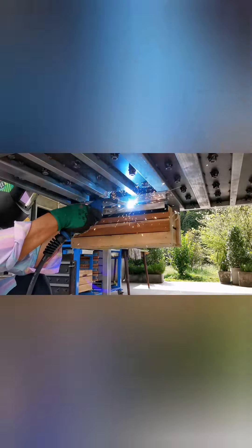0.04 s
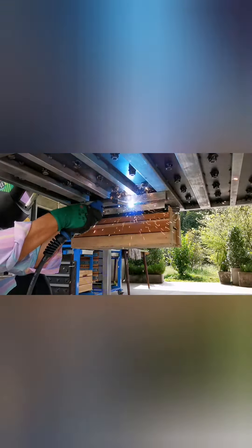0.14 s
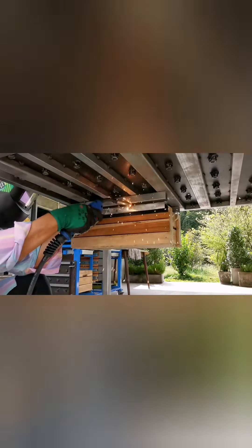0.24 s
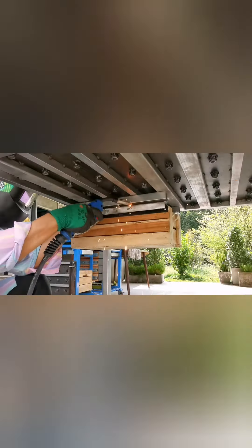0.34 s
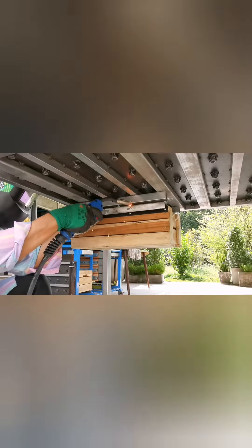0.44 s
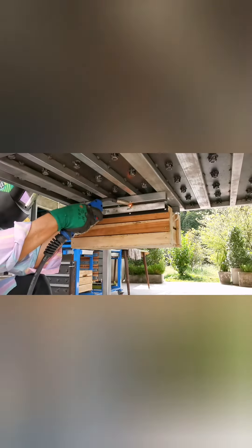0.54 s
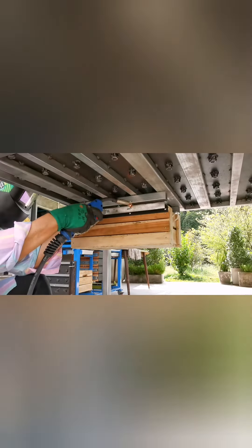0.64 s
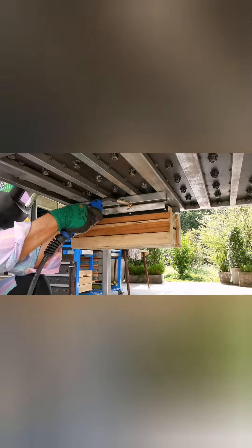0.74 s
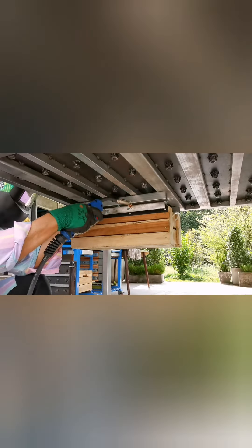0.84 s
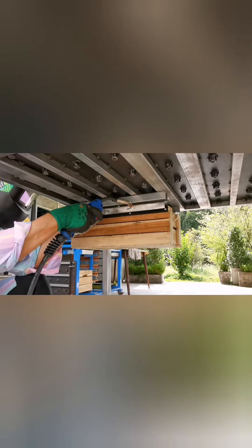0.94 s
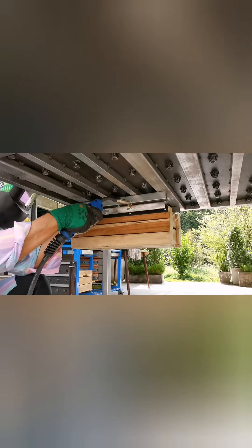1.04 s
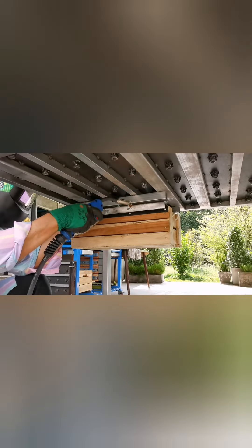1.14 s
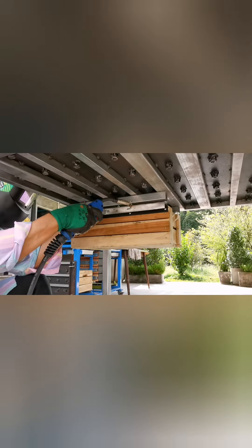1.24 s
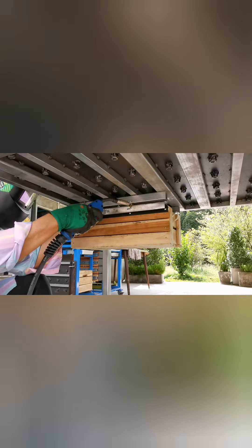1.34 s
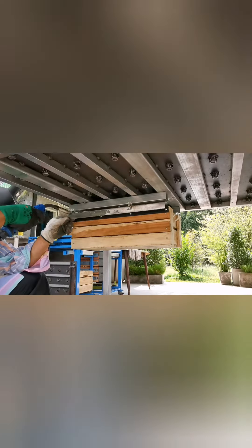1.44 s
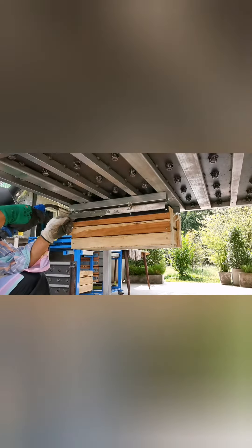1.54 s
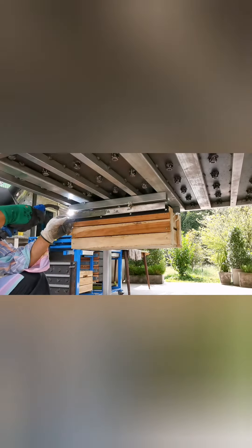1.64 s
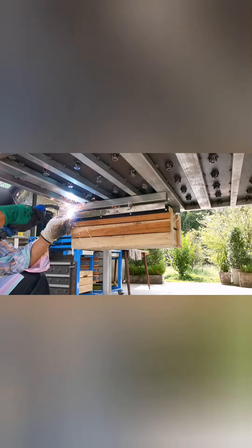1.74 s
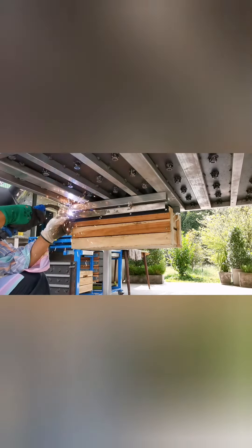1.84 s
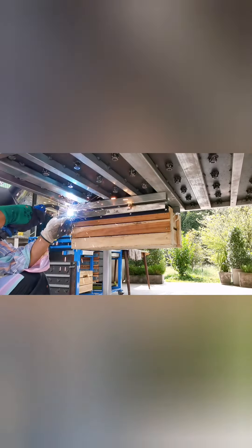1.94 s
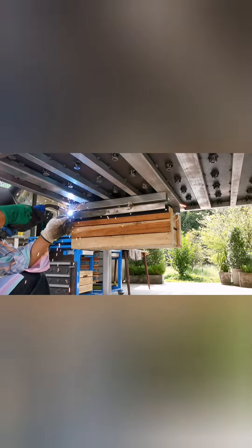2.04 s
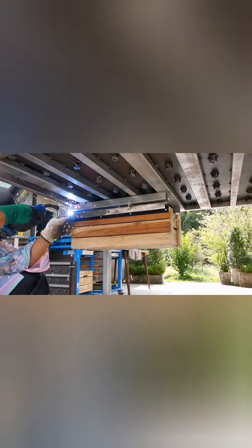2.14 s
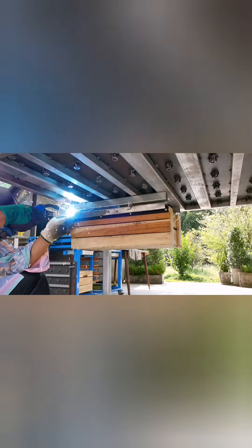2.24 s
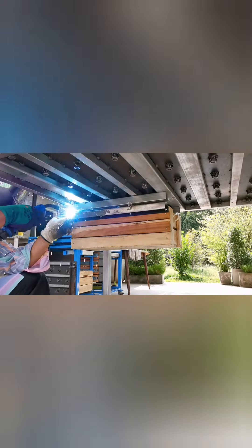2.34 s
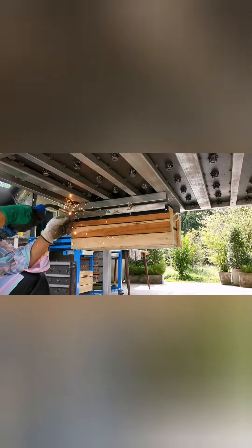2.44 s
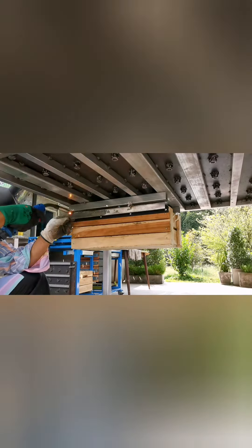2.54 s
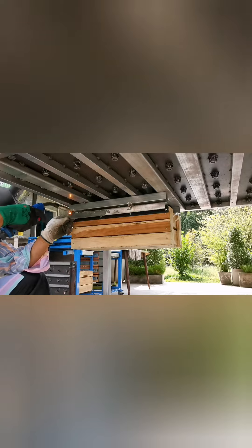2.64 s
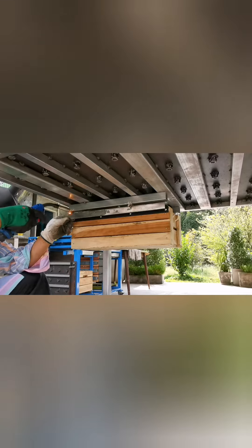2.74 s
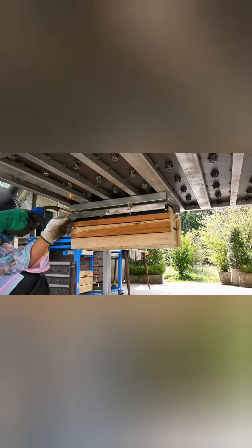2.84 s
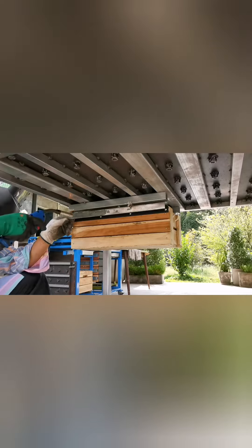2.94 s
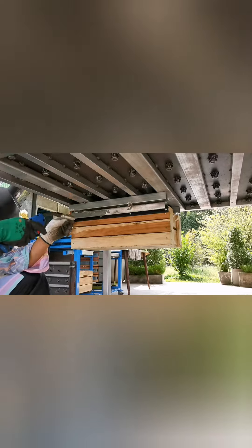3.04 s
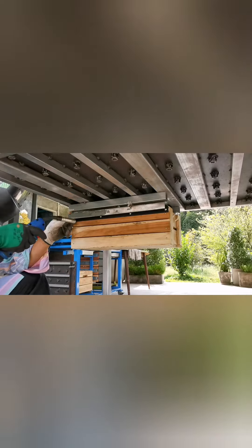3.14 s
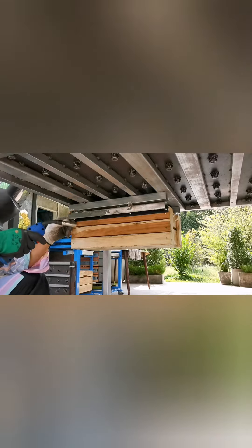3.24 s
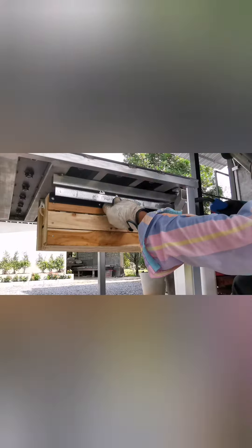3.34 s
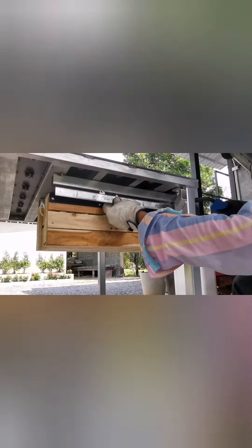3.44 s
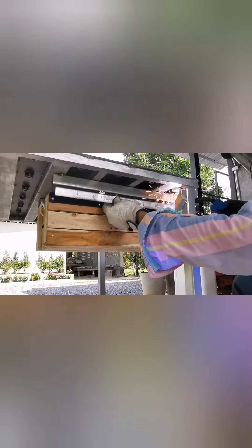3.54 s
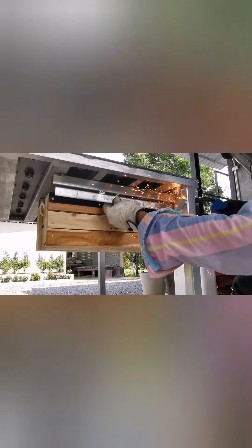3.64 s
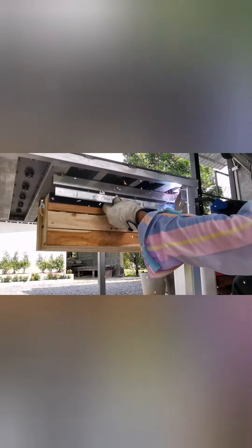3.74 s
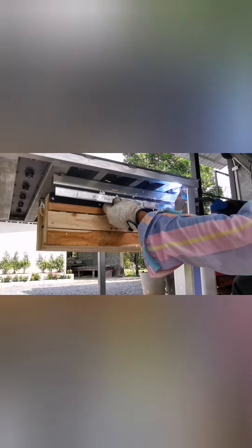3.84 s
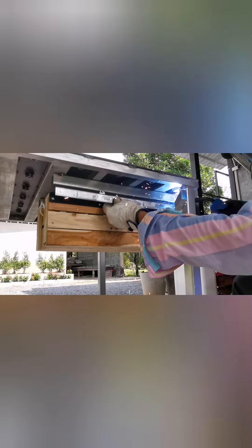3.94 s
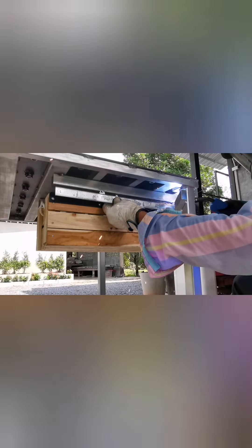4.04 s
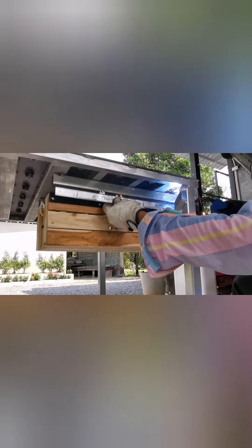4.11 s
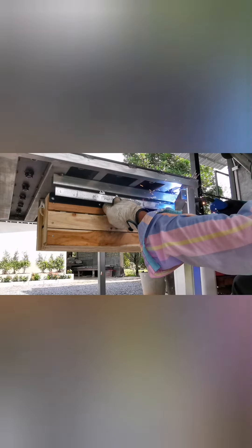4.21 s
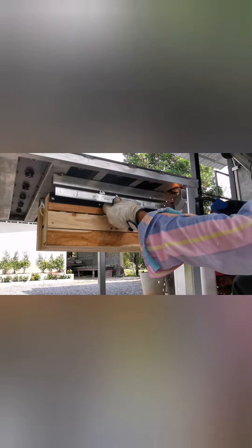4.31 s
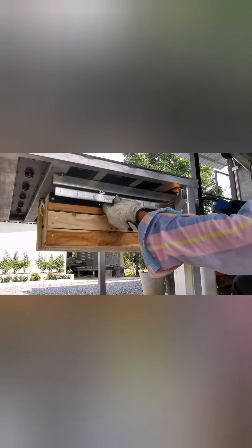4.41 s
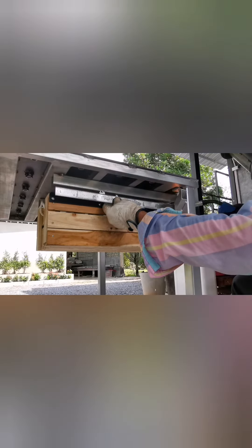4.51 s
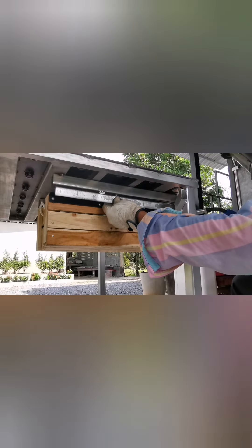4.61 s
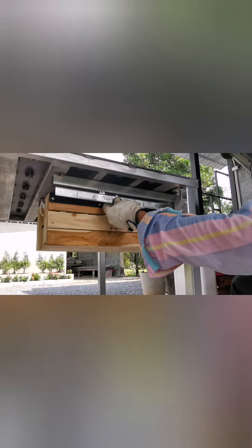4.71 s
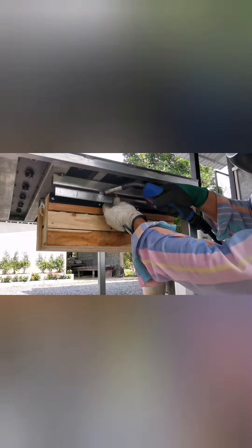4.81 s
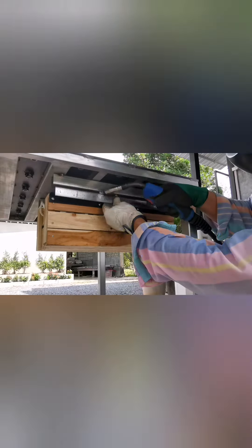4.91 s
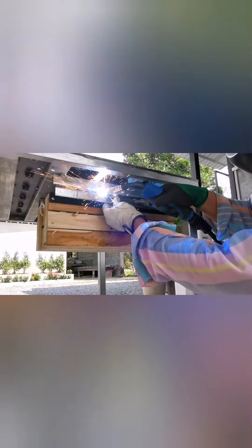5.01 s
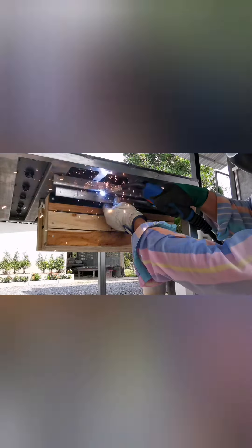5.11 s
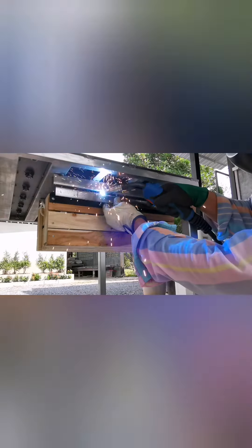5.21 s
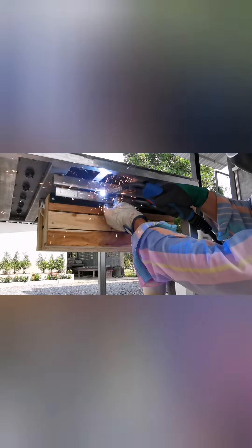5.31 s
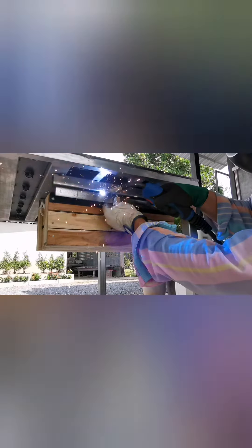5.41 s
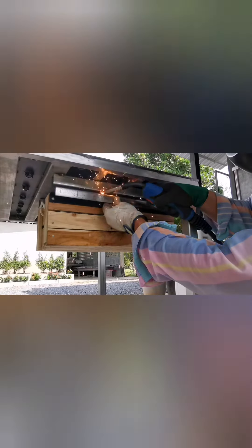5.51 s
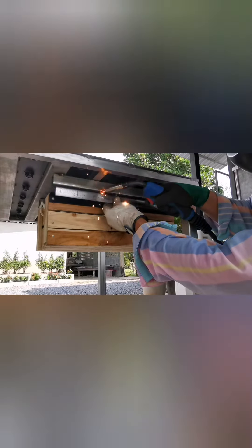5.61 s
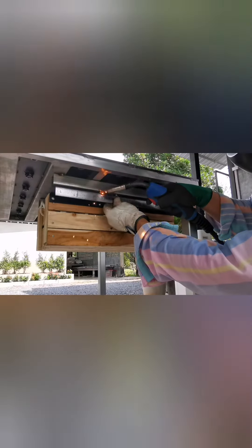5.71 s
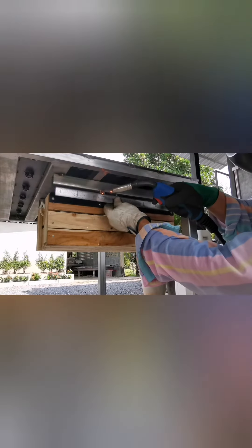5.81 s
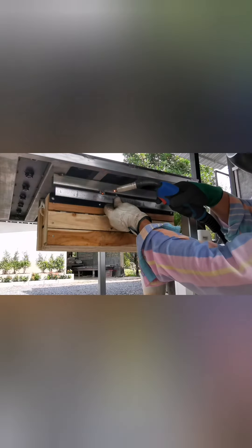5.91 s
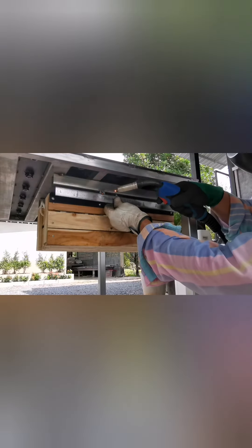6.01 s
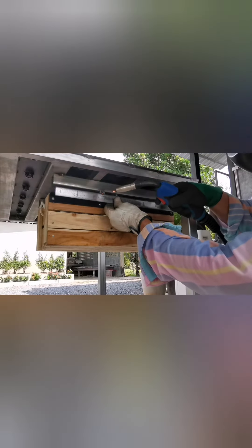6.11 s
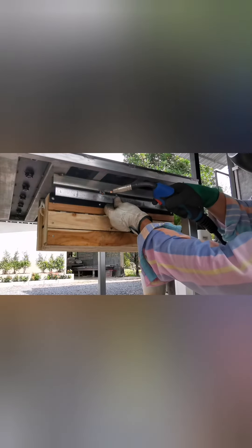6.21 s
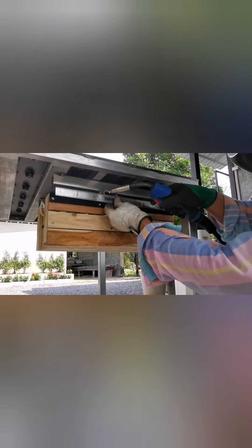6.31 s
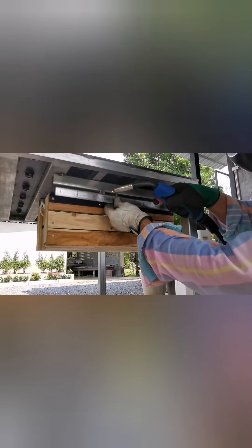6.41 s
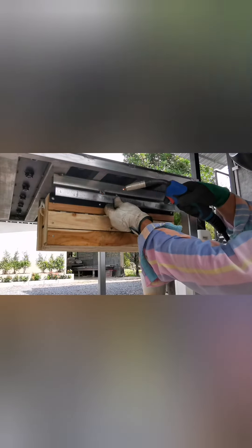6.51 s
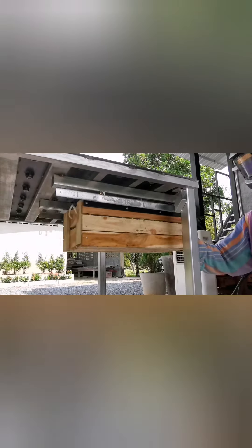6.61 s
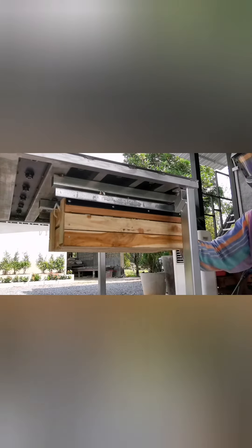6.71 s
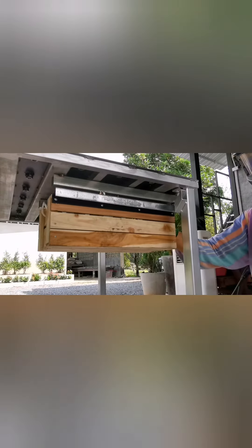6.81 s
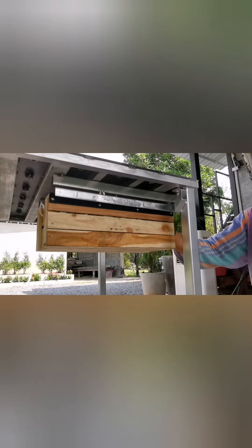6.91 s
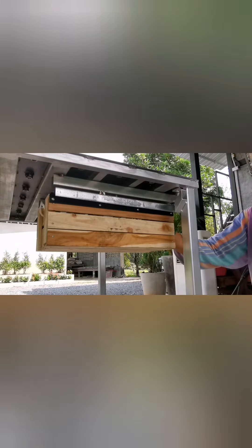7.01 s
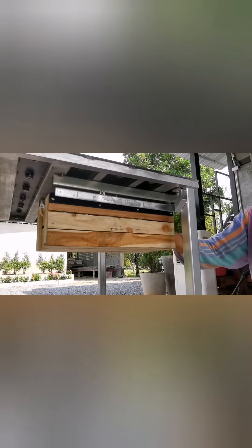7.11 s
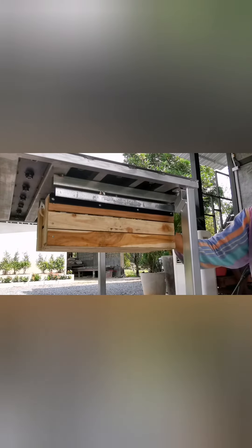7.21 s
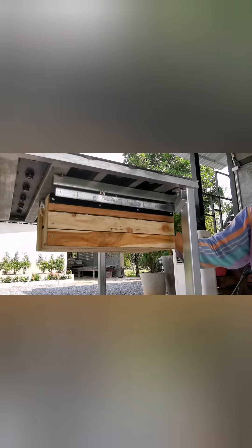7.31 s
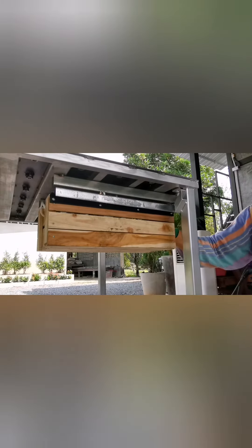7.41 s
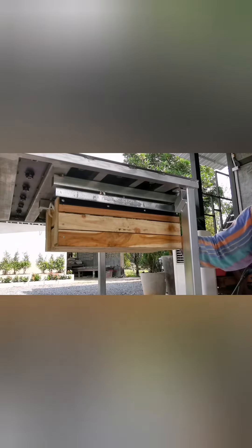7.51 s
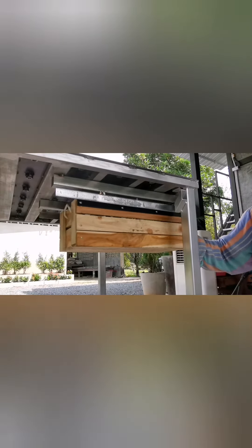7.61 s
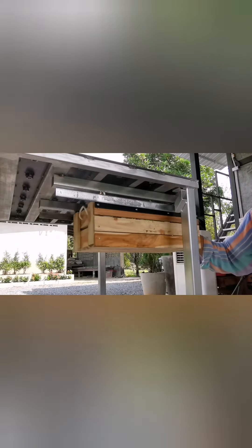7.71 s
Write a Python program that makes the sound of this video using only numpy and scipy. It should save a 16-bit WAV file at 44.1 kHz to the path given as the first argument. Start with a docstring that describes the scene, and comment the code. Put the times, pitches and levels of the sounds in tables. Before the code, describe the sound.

Four short bursts of crackling, sizzling wire-feed welding in an open workshop, quiet pauses between, then a drawer rumbles and rattles on its runners twice.

```python
"""In an open workshop a wire-feed welder lays four short tacks under a steel table; then a drawer is slid twice.
Each short circuit ends in a pop: a pressure spike, a slump and a crack, with echoes off the table and the floor.
Small ticks and a noisy sizzle fill the waits between the pops; the drawer is noise through resonances.
Behind, a noise-made yard murmurs and dips under the loud welding; a machine drones in sine lines,
a far motor hums for about a second, and gloves and sleeves rustle in swells of noise."""
import sys
import numpy as np
from scipy import signal
from scipy.io import wavfile
from scipy.ndimage import uniform_filter1d

SR = 44100
rng = np.random.default_rng(int(sys.argv[2]) if len(sys.argv) > 2 else 0)


def generate_wav(sig):
    """Save sig (samples, or channels by samples) to the path in sys.argv[1] as 16-bit PCM at SR."""
    pcm = np.round(np.clip(np.atleast_2d(sig).T, -1, 1) * 32767).astype(np.int16)
    wavfile.write(sys.argv[1], SR, pcm)


N = 341775

# The four tacks and their reflection paths. Each row: start in seconds, right minus left in dB for
# the spike, the slump and the crack, table echo delay in ms, spike echo left in dB, spike echo right in dB,
# crack echo left in dB (21 dB is added to it), crack brightness in dB per octave.
TACKS = [(0, -4, -13.5, 3, 2.38, -3.5, -39, -17, -2), (1.7, -15.5, 4, 0.5, 1.87, -20, -24, -35, -1.25),
         (3.5, -11, -4.5, 10, 2.396, -5.5, -42, -9.5, -2),
         (5, -8.5, -0.5, 6.5, 2.63, -8.5, -28, -14.5, -1.5)]
# Spectrum of the crack. Each row: frequency in Hz, density in dB.
CRACK_SPECTRUM = [(1500, -18.5), (3500, -10), (4800, -3), (5900, 0), (7100, 5), (7900, -10), (8800, -5.5),
                  (11000, -19), (14500, -10), (16500, -52)]


def pops():
    """Impulsive radiation: each pop sums a pressure spike, a slump, a ringing snap and a noisy crack."""
    out, crack_envelope = np.zeros((2, N)), strikes()
    t = np.arange(128) / SR
    shapes = [templates(tack) for tack in TACKS]
    for (s, k, spike_db, slump_db, crack_db), chance in zip(all_pops(), rng.standard_normal((600, 4))):
        spike, slump, crack = shapes[k]
        start = s - .0004  # the spike peaks 0.4 ms into its template
        add(out, start, gain_of(spike_db) * spike + gain_of(slump_db) * slump)
        snap_hz = 7300 * 2 ** (0.03 * TACKS[k][-1] + 0.067 * chance[:2, None])
        ringing = np.sin(2 * np.pi * snap_hz * t + 0.45 * chance[2:, None])
        snap = 0.7 * np.exp(-((t - .0008) / 0.0003) ** 2) * ringing
        add(out, start, snap * gain_of(crack_db + TACKS[k][3] * np.array([[-.5], [.5]])))
        add(crack_envelope, start, gain_of(crack_db) * crack)
    return out + crack_envelope * noise(CRACK_SPECTRUM, 1, 0.96, size=128, tilt=tack_tilt())


def templates(tack):
    """Superposed reflections: spike, slump and crack envelope reach each ear directly and as echoes."""
    _, spike_db, slump_db, crack_db, echo_ms, left_db, right_db, crack_echo_db, _ = tack
    t = np.arange(4096) / SR
    spike = np.exp(-((t - .0004) / 0.000091) ** 2) - 0.028 * np.exp(-((t - .00065) / .0001) ** 2)
    after = np.maximum(t - .0005, 0)
    # the hot gas collapses, then the pressure swings slowly back over zero
    swing = 0.038 * np.exp(-after / 0.04) - 1.93 * np.exp(-after / 0.0014)
    slump = (1 - np.exp(-after / 0.00054)) * swing
    # the crack scatters between the ribs of the table
    crack_decay = 0.46 * np.exp(-t / 0.00057) + 0.013 * np.exp(-t / 0.0092)
    crack = (1 - np.exp(-t / 0.00026)) * crack_decay
    paths = np.zeros((3, 2, 2048))  # spike, slump, crack; left, right
    paths[:, :, 0] = gain_of([[0, spike_db], [-slump_db / 2, slump_db / 2], [-crack_db / 2, crack_db / 2]])
    paths[:, :, round(echo_ms * SR / 1000)] = gain_of(
        [[left_db, right_db], [left_db + 2, right_db - 20], [crack_echo_db - crack_db / 2 + 21, -3]])
    paths[:, :, round(.0097 * SR)] = gain_of([[-20], [-30], [-20]])  # the floor
    paths[0] += gain_of(-16.0) * scatter(0.039, 2048 / SR, 0.37)
    return signal.fftconvolve(paths, np.array([spike, slump, crack])[:, None], axes=2)


# Clicks of the gun's trigger and gas valve, short bright bursts. Each row: start in seconds, level in dB, 60 dB
# decay time in seconds, right minus left in dB.
STRIKES = [(1.7243, -26.5, 0.11, 1.5), (3.574, -14, 0.028, -0.5), (5.021, -20.5, 0.054, 1)]


def strikes():
    """Exponential decay: crack envelopes of the trigger and gas valve clicks rise in 2.6 ms and die away."""
    envelope, t = np.zeros((2, N)), np.arange(8000) / SR
    for s, db, t60, pan_db in STRIKES:
        decay = gain_of(db - 60 * t / t60 + pan_db * np.array([[-.5], [.5]]))
        add(envelope, s, decay * np.minimum(t / 0.0026, 1))
    return envelope


# The louder pops of the arc. Each row: time in seconds, spike level in dB.
POPS = [(0.0178, -16.5), (0.037, -21.5), (0.0568, -15), (0.064, -12.5), (0.0886, -16.5), (0.0963, -20),
        (0.106, -16), (0.1147, -15), (0.1275, -16), (0.1352, -14.5), (0.1692, -12.5), (0.1805, -18.5),
        (0.1963, -13), (0.22, -18), (0.2294, -19.5), (0.2459, -26.5), (1.7887, -16.5), (1.7991, -23),
        (1.8609, -26.5), (1.8708, -33), (1.8824, -22.5), (1.9004, -25), (1.9304, -21), (1.9417, -24),
        (1.965, -19), (1.9748, -23.5), (1.9814, -29), (1.9871, -27), (1.9951, -22), (2.046, -20),
        (2.0868, -22.5), (2.1105, -34), (2.1241, -15), (2.1485, -21), (2.2092, -25.5), (2.232, -22),
        (2.2622, -29), (2.2685, -24.5), (2.2857, -24), (2.2937, -24.5), (2.3162, -28), (2.3254, -23.5),
        (2.3353, -20.5), (2.345, -29), (2.3551, -29), (2.365, -26.5), (2.3838, -27.5), (2.451, -22.5),
        (2.4894, -30), (3.5976, -31.5), (3.6163, -29), (3.6521, -24), (3.6873, -9), (3.7288, -18.5),
        (3.7435, -10.5), (3.749, -36), (3.7634, -23.5), (3.825, -21), (3.8343, -20), (3.8677, -22),
        (3.8733, -13), (3.8809, -19), (3.8885, -20.5), (3.9044, -16), (3.9158, -25), (3.9307, -19),
        (3.9608, -29), (4.0504, -27.5), (4.0929, -24.5), (4.1351, -18), (4.2018, -24), (4.2117, -14.5),
        (4.2515, -30.5), (5.0773, -8), (5.0846, -13.5), (5.0925, -31), (5.0976, -16), (5.1017, -15.5),
        (5.112, -20), (5.1165, -21), (5.126, -16), (5.1372, -19.5), (5.1498, -11.5), (5.1622, -16.5),
        (5.1714, -11.5), (5.2037, -11), (5.226, -20), (5.2428, -10.5), (5.2581, -18.5), (5.2756, -16.5),
        (5.3043, -20.5), (5.3159, -20), (5.3225, -14), (5.3287, -22), (5.335, -12.5), (5.3462, -23.5),
        (5.3597, -23), (5.3673, -12), (5.4057, -14.5), (5.4182, -47), (5.425, -19.5), (5.4313, -17),
        (5.4613, -19.5), (5.492, -33), (5.507, -29)]
# The arc of each tack. Each row: arc on in seconds, arc off in seconds, sizzle in dB, flare at ignition in dB
# against the sizzle (and added to the ticks), crack and slump in dB of a pop of middle spike and usual wait,
# crack of the small ticks in dB.
ARCS = [(0, .2457, -40.5, -2, -19.5, -42.5, -46), (1.788, 2.487, -48, 3.5, -17.5, -34, -26),
        (3.587, 4.2646, -47, 12.5, -21, -38, -30.5), (5.054, 5.5404, -49, 7.5, -21, -37, -33.5)]
# Quieter moments: ticks are left out and the sizzle is hushed; the row at 1.774 lies just before the second
# arc starts. Each row: middle in seconds, length in seconds.
HUSHES = [(0.155, 0.026), (1.774, .026), (2.023, 0.039), (2.192, 0.028), (2.438, 0.024), (3.707, 0.027),
          (3.819, 0.018), (5.187, 0.022)]
# Rate of the small ticks: one value a tack weld, in ticks per second.
TICKS_PER_S = [120, 150.46, 125, 90]
# The tick with which the arc breaks: one value a tack weld, its crack in dB.
BREAKS_DB = [-40, -26.5, -29, -23.5]
MIDDLE_DB, USUAL_WAIT_S = -20, .01
SLUMP_SLOPE, CRACK_SLOPE = 1.78, 0.74  # dB of slump and of crack for each dB of spike
SLUMP_WAIT_DB, CRACK_WAIT_DB = 2, 1.73  # more for each doubling of the wait since the last pop
TICK_JITTER_S, TICK_SPREAD_DB = .0012, 3.5
TICK_SPIKE_DB = -14  # the low spike of a tick against its crack
FLARE_S = 0.074  # decay constant of the flare


def all_pops():
    """Relaxation cycle: louder pops, stronger after longer waits, with jittered small ticks strung between.

    Rows hold time in seconds, tack index, and spike, slump and crack in dB."""
    rows, chance = [], rng.standard_normal((len(POPS) + len(ARCS), 24, 2))
    for k, (on, off, _, flare_db, crack_db, slump_db, tick_db) in enumerate(ARCS):
        last = on
        for n, (s, db) in enumerate(list(POPS) + [(off, None)]):
            if not on - USUAL_WAIT_S < s < off + USUAL_WAIT_S:
                continue
            wait_s = s - last if last > on else 1  # the first pop counts as a long wait
            doublings = np.log2(np.clip(wait_s, .004, .06) / USUAL_WAIT_S)
            count = round((s - last) * TICKS_PER_S[k])
            for m in range(1, count):
                size, shift = chance[n + k * (db is None), m]
                at = last + (s - last) * m / count + TICK_JITTER_S * shift
                small = tick_db + TICK_SPREAD_DB * size + flare_db * np.exp((on - at) / FLARE_S)
                if all(abs(at - middle) > length / 2 for middle, length in HUSHES):
                    rows.append((at, k, small + TICK_SPIKE_DB, -200, small))  # practically no slump
            if db is None:  # the arc breaks
                rows.append((s, k, BREAKS_DB[k] + TICK_SPIKE_DB, -200, BREAKS_DB[k]))
            else:
                slump = slump_db + SLUMP_SLOPE * (db - MIDDLE_DB) + SLUMP_WAIT_DB * doublings
                crack = crack_db + CRACK_SLOPE * (db - MIDDLE_DB) + CRACK_WAIT_DB * doublings
                rows.append((s, k, db, slump, crack))
            last = s
    return rows


# Spectrum of the sizzle. Each row: frequency in Hz, density in dB.
SIZZLE = [(400, -24.5), (2500, -19), (4500, -15), (5800, -10), (7000, -3), (7900, 4), (8800, -12.5),
          (11500, -15.5), (15000, -17), (16500, -46)]


def arc():
    """Shot noise: randomly timed drops of spatter, each dying away, modulate a hiss under the pops."""
    drops = (rng.random(N) < 110 / SR) * gain_of(2 + 7.4 * rng.standard_normal(N))  # about 110 a second
    spatter = 1 + signal.oaconvolve(drops, np.exp(-np.arange(512) / SR / 0.0021))[:N]
    hiss = evened(spatter * noise(SIZZLE, 2.7, 0.91, size=256, tilt=tack_tilt()))
    return hiss * sizzling() * gain_of([[-1.5], [1.5]])


HUSH_SHARE = 0.38  # part of the sizzle that is lost at the middle of a hush
STIR_S, STIR_DB = 0.012, 14  # each louder pop stirs the sizzle: decay constant, gain over its spike


def sizzling():
    """Amplitude modulation: a hold, a flare at ignition, a stir after each louder pop, brief hushes."""
    t, (s, db) = np.arange(N) / SR, np.transpose(POPS)
    kicks = np.zeros(N)
    kicks[(s * SR).astype(int)] = gain_of(db + STIR_DB)
    stir = signal.lfilter([1], [1, -np.exp(-1 / SR / STIR_S)], kicks)
    hush = 1 - np.clip(HUSH_SHARE, 0, 1) * bumps([(middle, length, 0) for middle, length in HUSHES])
    hold = np.zeros(N)
    for on, off, sizzle_db, flare_db, *_ in ARCS:
        flare = gain_of(flare_db) * np.exp(-abs(t - on) / FLARE_S)
        hold += gain_of(sizzle_db) * (t >= on) * (t < off) * (1 + stir + flare)
    return uniform_filter1d(hold * hush, size=200)


def tack_tilt():
    """Spectral tilt: points of time in seconds and dB per octave, held for a second from each tack's start."""
    return [(tack[0] + s, tack[-1]) for tack in TACKS for s in (0, 1)]


SHADE_HZ, SHADE_DB = (3800, 5950), [-1.5, -4.5, 0, 1.5]  # one value a tack, on the filtered band


def shaded(x):
    """Screening: the table weakens or passes the lower treble, according to where the tack lies."""
    band = signal.sosfiltfilt(signal.butter(2, SHADE_HZ, "band", fs=SR, output="sos"), x)
    tack = np.searchsorted([row[0] for row in TACKS], np.arange(N) / SR, "right") - 1
    return x + (gain_of(SHADE_DB)[tack] - 1) * band


def workshop(near):
    """Late reverberation: dense reflections give the welding a thin bright tail."""
    bright = signal.sosfilt(signal.butter(2, [3300, 9500], "band", fs=SR, output="sos"), near.mean(0))
    tail = signal.oaconvolve(bright[None], scatter(0.57, 0.61, 21), axes=1)[:, :N]
    return gain_of(-10) * tail


# Drawer runs, one list a push. Each row: time in seconds, level in dB.
SLIDES = [
    [(6.515, -51), (6.535, -35.5), (6.67, -29.5), (6.8, -34.5), (6.885, -38), (6.9, -29), (6.95, -36),
     (7.04, -52.5), (7.12, -64)],
    [(7.395, -77), (7.425, -41.5), (7.49, -39.5), (7.55, -29.5), (7.6, -30.5), (7.75, -29)],
]
# Spectrum of the runners. Each row: frequency in Hz, density in dB.
RUNNER = [(120, -40), (200, -20.5), (480, -3.5), (620, -7), (1500, -10.5), (4860, -17), (7540, -9),
          (10100, -39.5), (14900, -46), (16000, -68)]
# Resonances of the drawer. Each row: frequency in Hz, width in Hz, peak in dB (5 dB is added to it).
DRAWER = [(472, 40, -2.5), (840, 9.7, 0), (1012, 10, 3.5), (1320, 35, 4.5), (1700, 38, -2), (2390, 100, -6),
          (3800, 180, 0), (5700, 91, -4.5), (7260, 30, -25)]
# Jolts of the drawer. Each row: middle in seconds, level in dB against the run before a high-pass, length in seconds.
JOLTS = [(6.708, 2, 0.0051), (6.762, 3.5, 0.013), (6.8, 4, 0.033), (6.896, 4, 0.025), (7.56, 3.5, 0.0085),
         (7.641, 9, 0.0098), (7.694, 1, 0.018)]
BRIGHT_START, BRIGHT_END = (0.79, 1.3), (-1.7, 0.72)  # dB per octave at the ends of each push


def drawer():
    """Rolling excitation of resonances: balls rumble along the runners and ring the drawer; jolts stand out."""
    tilt = []
    for rows, start_tilt, end_tilt in zip(SLIDES, BRIGHT_START, BRIGHT_END):
        tilt += [(rows[0][0], start_tilt), (rows[-1][0], end_tilt)]
    rumble = noise(RUNNER, 3.5, 0.52, size=2048, modes=DRAWER, modes_db=5.0, tilt=tilt)
    knocks = gain_of(1.2 * evened(uniform_filter1d(rng.standard_normal(N), size=120)))
    # a jolt rattles mostly the treble
    bright = signal.sosfilt(signal.butter(2, 1800, "high", fs=SR, output="sos"), rumble)
    jolts = bright * bumps([(s, length, db) for s, db, length in JOLTS])
    run = sum(level(rows) for rows in SLIDES)
    return (evened(rumble * knocks) + jolts) * run * gain_of([[1.2], [-1.2]])


# Spectrum of the cabinet's boom. Each row: frequency in Hz, density in dB.
CABINET = [(30, -32), (70, 4), (150, 5), (260, -6), (450, -46)]
# The cabinet is shaken. Each row: middle in seconds, length in seconds, level in dB.
BOOMS = [(6.94, 0.27, -51.5), (7.1, 0.14, -63), (7.5, 0.15, -58)]


def cabinet():
    """Structure-borne sound: the cabinet booms along with the drawer and when it is shaken."""
    run = sum(level(rows) for rows in SLIDES)
    boom_level = gain_of(-28.5) * run + bumps(BOOMS)
    return noise(CABINET, 3.0, 0.88, size=2048) * boom_level


# Spectrum of the cloth. Each row: frequency in Hz, density in dB.
RUSTLE = [(470, -37), (800, 1), (1140, -1), (4570, -11), (7260, -1), (10600, -28), (14500, -28),
          (16000, -38)]
# Gloves and sleeves. Each row: middle in seconds, length in seconds, level in dB.
RUSTLES = [(.46, 0.03, -63), (1.12, 0.068, -64.5), (2.77, .08, -66), (3.18, 0.023, -66.5),
           (3.3, 0.053, -59), (3.38, 0.12, -56), (3.53, 0.13, -60), (4.48, 0.083, -65), (4.75, 0.029, -58),
           (4.87, 0.16, -66), (5.99, 0.081, -61.5), (6.38, 0.12, -58.5), (7.2, 0.45, -75)]


def cloth():
    """Friction noise: gloves and sleeves rustle in smooth swells over a faint steady hiss."""
    return noise(RUSTLE, 1.0, 1.8) * (gain_of(-71.5) + bumps(RUSTLES))


# Spectrum of the yard's murmur. Each row: frequency in Hz, density in dB.
YARD = [(15, -26), (25, -4), (253, -2.5), (375, -1.5), (645, -11.5), (786, -12), (1110, -11.5),
        (9000, -32.5), (11700, -79), (19800, -120)]
# Spectrum of the low rumble. Each row: frequency in Hz, density in dB.
RUMBLE = [(25, -22.5), (50, -4.5), (80, 11), (150, -5.5), (210, -51)]
# Stepped background, before ducking. Each row: start in seconds, murmur in dB, low rumble in dB.
AROUND_STEPS = [(0, -57, -61.5), (1.38, -61.5, -79), (3.26, -55, -74), (4.3, -59, -70), (5.5, -61, -81),
                (6.6, -55.5, -64.5)]


def yard(duck):
    """Resonant and band-shaped noise: murmur with the machine's drone, and low rumble, at stepped levels."""
    modes = [(242.4, 14, 3.5), (363, 45, -22.0), (640, 18, 4.5), (727, 22, 5), (1135.4, 24, -0.5)]
    murmur = noise(YARD, 0.7, 1.0, size=4096, modes=modes) + fan()
    rumble = noise(RUMBLE, 0.98, 1, size=4096, modes=[(55, 8, 9.1)])
    return (murmur * steps(column=1) + rumble * steps(column=2)) * duck


def steps(column):
    """Piecewise-constant level: a column of the background table, held from row to row with soft edges."""
    rows = np.asarray(AROUND_STEPS)
    row = np.searchsorted(rows[:, 0], np.arange(N) / SR, "right") - 1
    return gain_of(uniform_filter1d(rows[row, column], size=3000))


DUCK_FROM_DB, DUCK_SHARE = -53.5, 0.41  # threshold; dB of fall for each dB over it
RECOVER_DB_PER_S = 57.5  # fall of the held welding level


def ducking(near):
    """Peak hold with release: the background dips quickly under the loud welding and recovers slowly."""
    power_db = 10 * np.log10(abs(uniform_filter1d((near ** 2).mean(0), size=800)) + 1e-12)
    fall = np.arange(N) * RECOVER_DB_PER_S / SR
    held_db = np.maximum.accumulate(power_db + fall) - fall
    over_db = np.maximum(held_db - DUCK_FROM_DB, 0)
    return gain_of(-DUCK_SHARE * uniform_filter1d(over_db, size=400))


# Steady lines of a machine nearby. Each row: frequency in Hz, mean level in dB against the murmur.
FAN = [(54, -10.5), (635, -15.5), (706, -20.5)]


def fan():
    """Line spectrum: the machine's thin sine lines waver a little in level and pitch."""
    hz, db = np.transpose(FAN)[:, :, None]
    chance = rng.standard_normal((2, len(FAN), N))
    sway, drift = evened(uniform_filter1d(uniform_filter1d(chance, size=3000), size=3000))
    turns = np.cumsum(hz * (1 + 0.0042 * drift), axis=1) / SR
    return (gain_of(db + 4.4 * sway) * np.sin(2 * np.pi * turns)).sum(0)


# The far motor. Each row: time in seconds, pitch in Hz, level in dB (shared by two unequal partials).
MOTOR = [(0.3, 167, -64.5), (0.562, 175.3, -57.5), (1.4, 192, -65.5)]


def motor():
    """Frequency glide: two wavering partials, at 1 and 1.33 times a gliding pitch, make the hum."""
    s, hz, _ = np.transpose(MOTOR)
    waver = 1 + 0.39 * evened(uniform_filter1d(rng.standard_normal((2, N)), size=1800))
    turns = np.cumsum(np.interp(np.arange(N) / SR, s, hz)) / SR
    partials = waver * gain_of([[3], [-3]]) * np.sin(2 * np.pi * turns * [[1], [1.33]])
    return level(MOTOR, column=2) * partials.sum(0)


# Likeness of the two ears. Each row: frequency in Hz, left-right correlation from 0 to 1.
SAME = [(60, 0.93), (180, 0.96), (550, 0.96), (1650, 0.72), (4970, 0.25), (15000, 0.023)]


def noise(spectrum, patchy_db, flicker_db, size=512, modes=(), modes_db=0, tilt=((0, 0), (9, 0))):
    """Filtered Gaussian noise, two ears, rms 1: resonances, drifting patches, a flicker shared by all bands."""
    frames, hz = 4 * N // size + 5, np.fft.rfftfreq(size, 1 / SR)
    a, b, c, d, patches = rng.standard_normal((frames, len(hz), 5)).T
    patches = evened(uniform_filter1d(uniform_filter1d(patches, size=6, axis=0), size=12, axis=1))
    flicker = evened(uniform_filter1d(rng.standard_normal(frames), size=3))
    peaks = 1 + sum(gain_of(db + modes_db) / np.hypot(1, 2 * (hz - f) / w) for f, w, db in modes)
    db_per_octave = np.interp(np.arange(frames) * size / 4 / SR, *np.transpose(tilt))
    slope = db_per_octave * np.log2((hz[:, None] + 50) / 2000)
    same = np.clip(read(SAME, hz), -1, 1)[:, None]
    left = a + 1j * b
    right = same * left + np.sqrt(1 - same ** 2) * (c + 1j * d)
    z = np.array([left, right]) * (gain_of(read(spectrum, hz)) * peaks)[:, None]
    z *= gain_of(slope + patchy_db * patches + flicker_db * flicker)
    return evened(signal.istft(z, nperseg=size, noverlap=3 * size // 4)[1][:, :N])


def scatter(t60, length, start_ms):
    """Diffuse reflection: dense random taps for two ears that die away, energy 1 in each."""
    t = np.arange(round(length * SR)) / SR
    taps = rng.standard_normal((2, len(t))) ** 3 * gain_of(-60 * t / t60) * (t > start_ms / 1000)
    return taps / np.linalg.norm(taps, axis=1, keepdims=True)


def bumps(rows):
    """Gaussian envelopes: smooth swells from rows of middle in seconds, length in seconds, dB."""
    t = np.arange(0, N + 32, 32) / SR
    swells = sum(gain_of(db) * np.exp(-(2 * (t - s) / length) ** 2) for s, length, db in rows)
    return np.interp(np.arange(N) / SR, t, swells)


def level(rows, column=1):
    """Decibel interpolation: a dB column as a gain for every sample, practically silent outside the table."""
    rows = np.asarray(rows)
    return gain_of(np.interp(np.arange(N) / SR, rows[:, 0], rows[:, column], -200, -200))


def read(points, hz):
    """Logarithmic frequency scale: interpolates a table of frequency in Hz and value."""
    f, value = np.transpose(points)
    return np.interp(np.log(hz + 1), np.log(f + 1), value)


def add(mix, s, sound):
    """Superposition: mixes a short sound in at time s."""
    part = mix[..., round(s * SR):][..., :sound.shape[-1]]
    part += sound[..., :part.shape[-1]]


def gain_of(db):
    """Decibel law: level to amplitude ratio."""
    return 10 ** (np.asarray(db) / 20)


def evened(x):
    """Root mean square: scales to rms 1."""
    return x / np.sqrt(np.mean(x ** 2) + 1e-20)


def scene():
    """Superposition of all sources, with the welding's tail and the ducked yard."""
    near = shaded(pops() + arc())
    welding = near + workshop(near)
    background = cloth() + yard(ducking(near)) + motor()
    return welding + drawer() + cabinet() + background


def record(dry):
    """Band limitation: a linear-phase low-pass cuts off at 16.4 kHz."""
    lowpass = signal.firwin(511, 16400, window=("kaiser", 9), fs=SR)
    return signal.oaconvolve(dry, lowpass[None], "same")


dry = scene()
out = record(dry)
generate_wav(out)
```